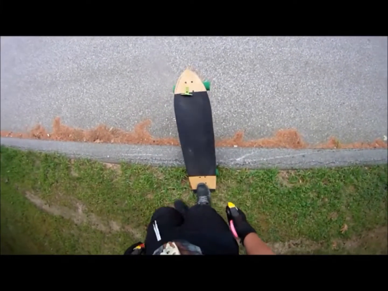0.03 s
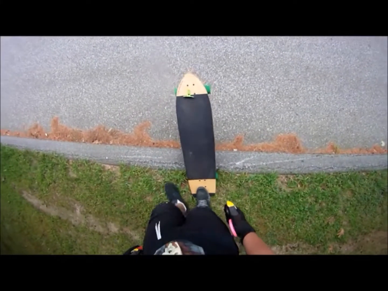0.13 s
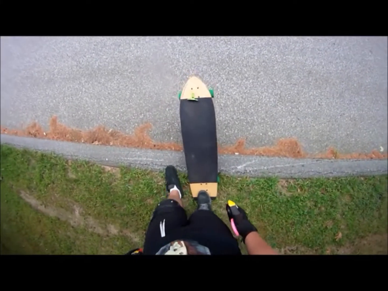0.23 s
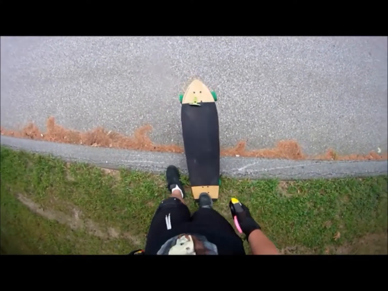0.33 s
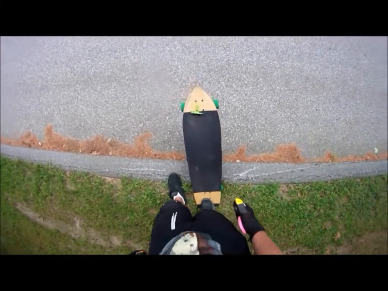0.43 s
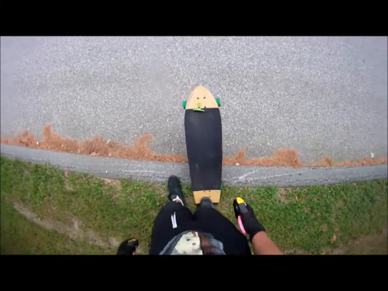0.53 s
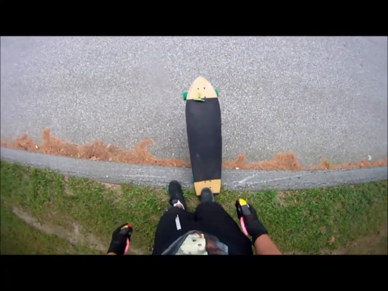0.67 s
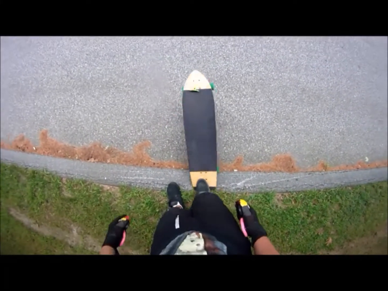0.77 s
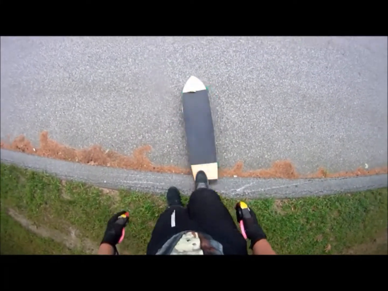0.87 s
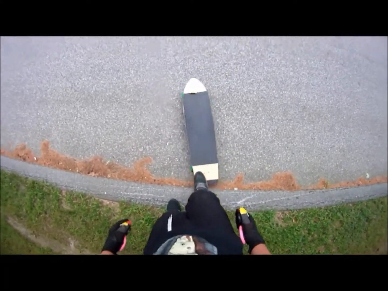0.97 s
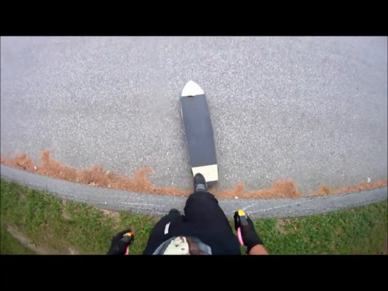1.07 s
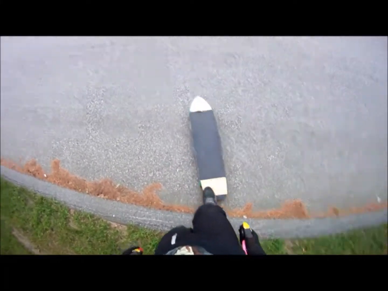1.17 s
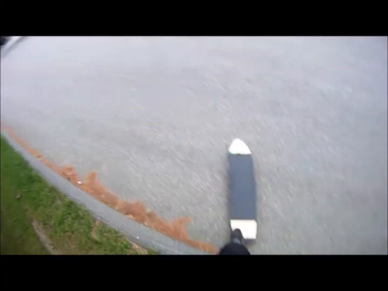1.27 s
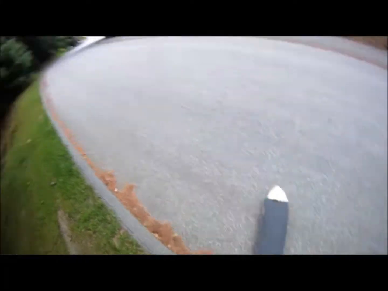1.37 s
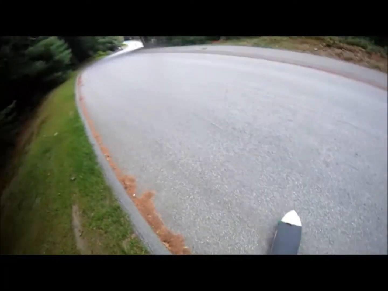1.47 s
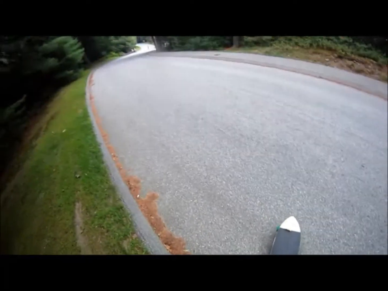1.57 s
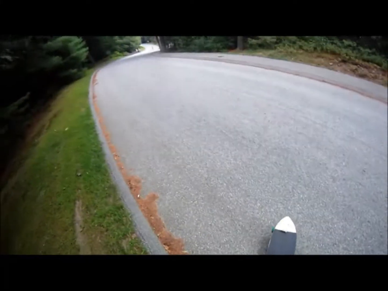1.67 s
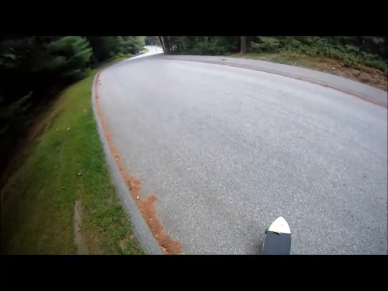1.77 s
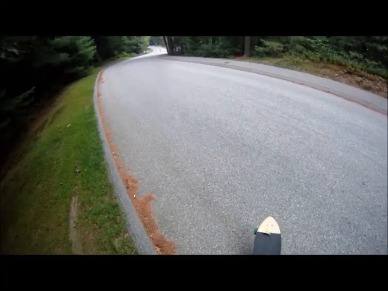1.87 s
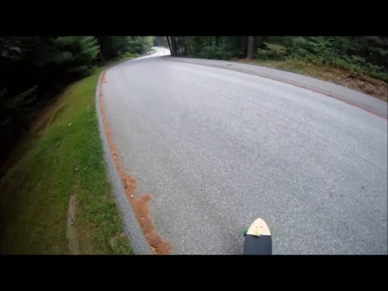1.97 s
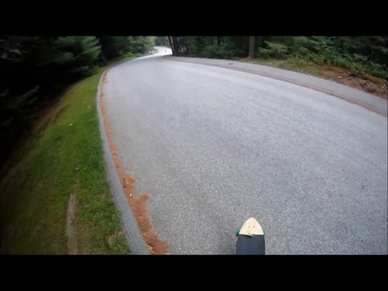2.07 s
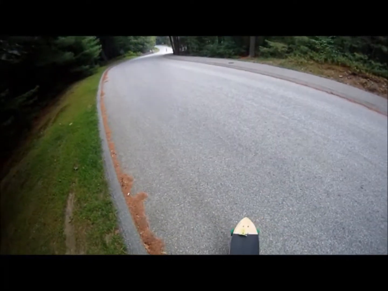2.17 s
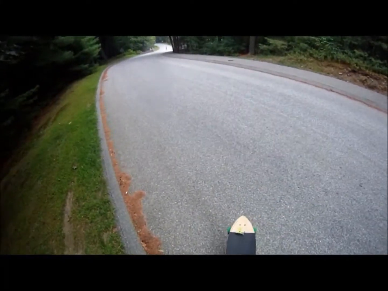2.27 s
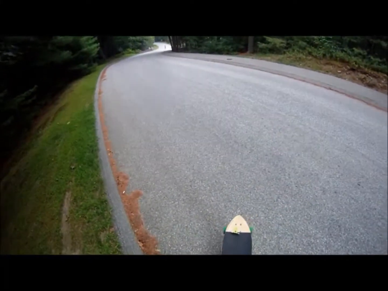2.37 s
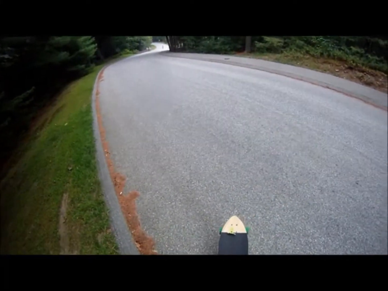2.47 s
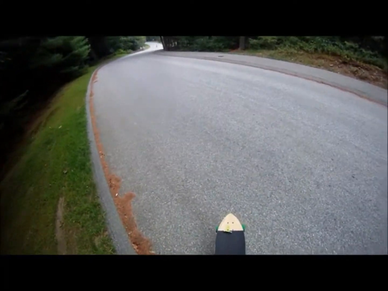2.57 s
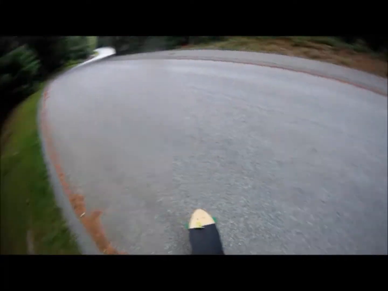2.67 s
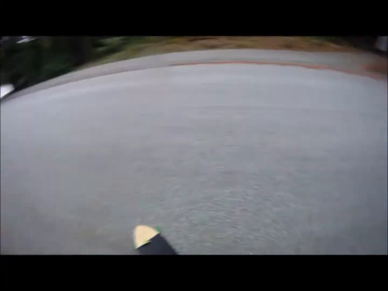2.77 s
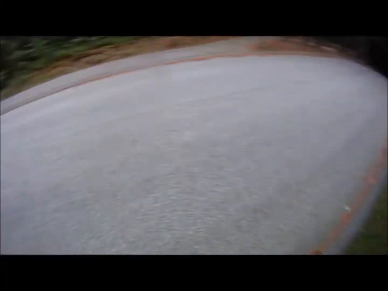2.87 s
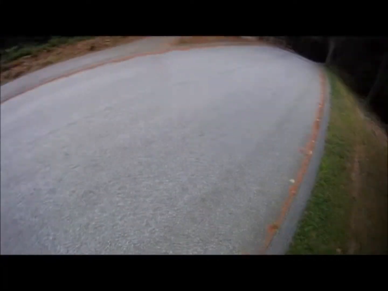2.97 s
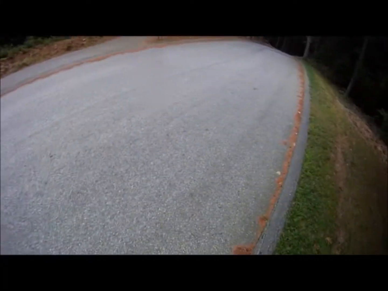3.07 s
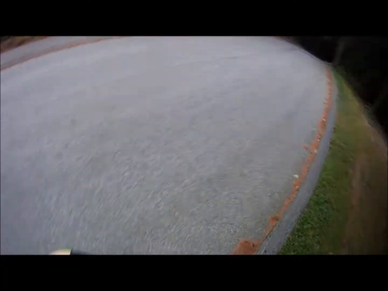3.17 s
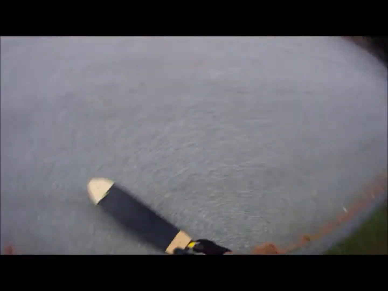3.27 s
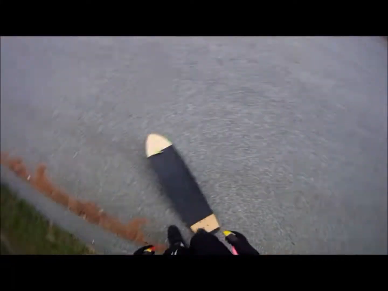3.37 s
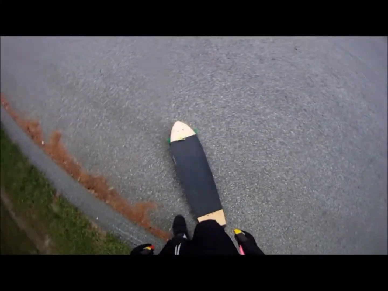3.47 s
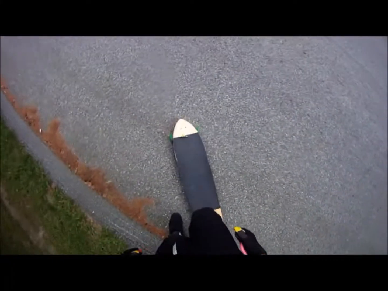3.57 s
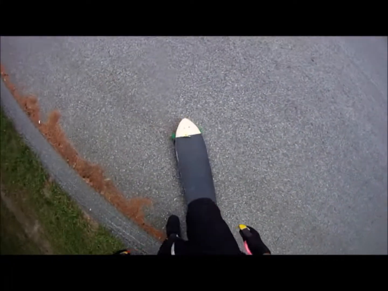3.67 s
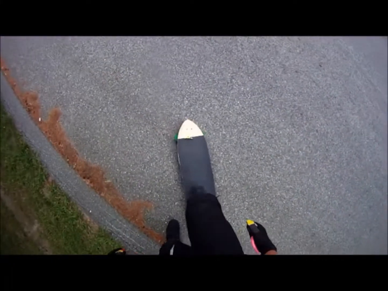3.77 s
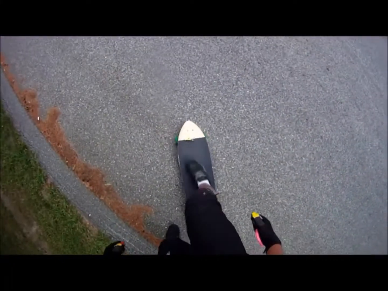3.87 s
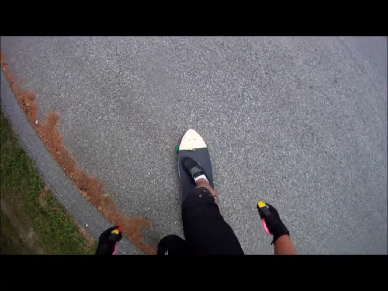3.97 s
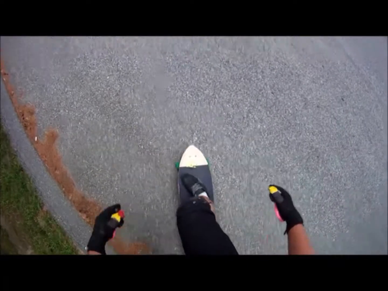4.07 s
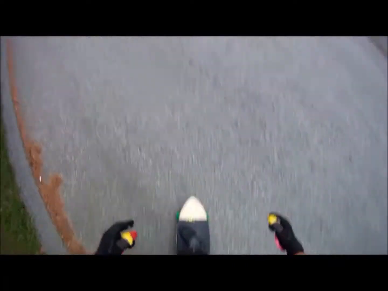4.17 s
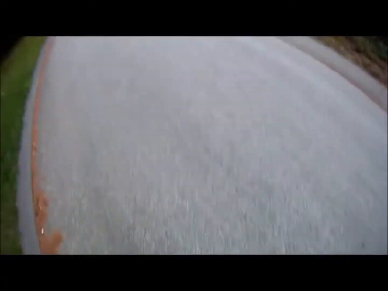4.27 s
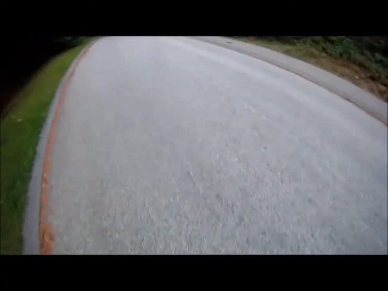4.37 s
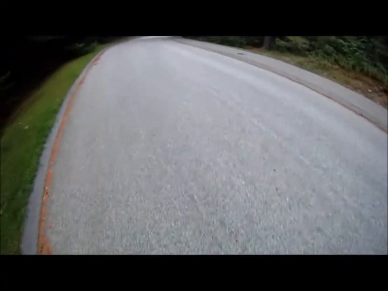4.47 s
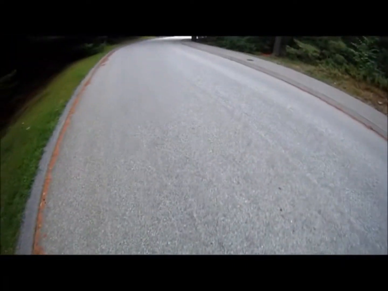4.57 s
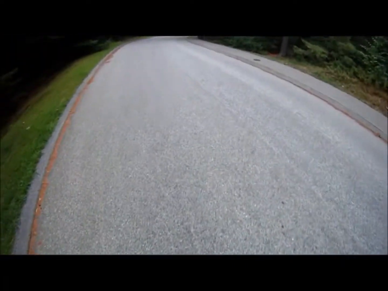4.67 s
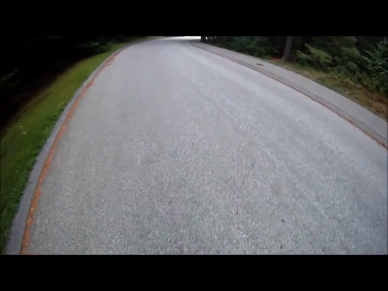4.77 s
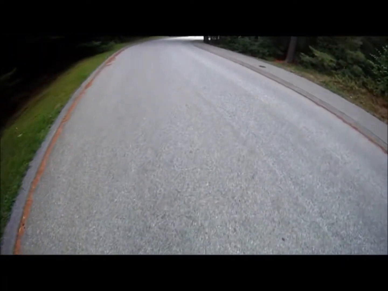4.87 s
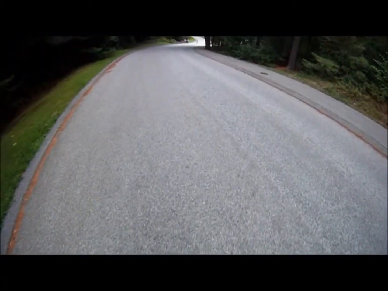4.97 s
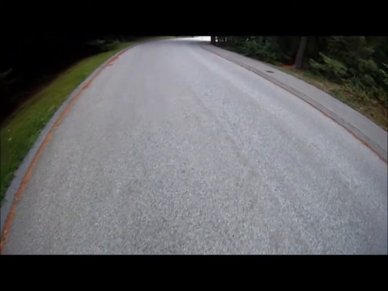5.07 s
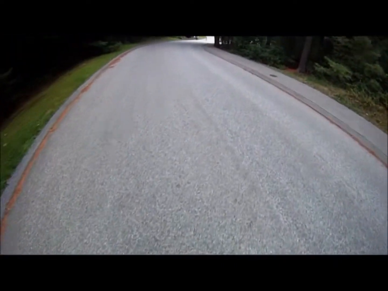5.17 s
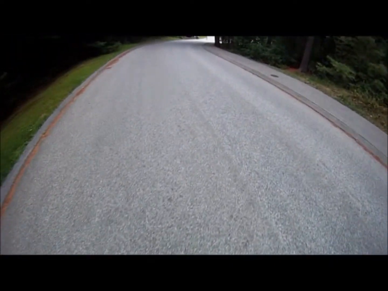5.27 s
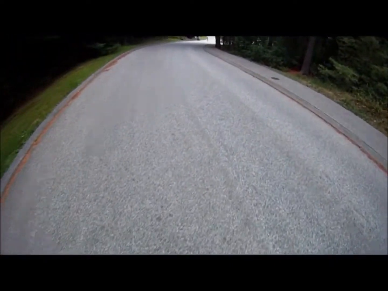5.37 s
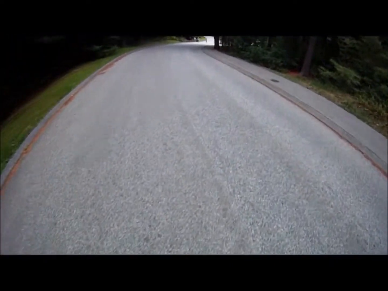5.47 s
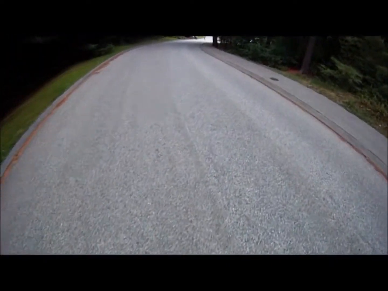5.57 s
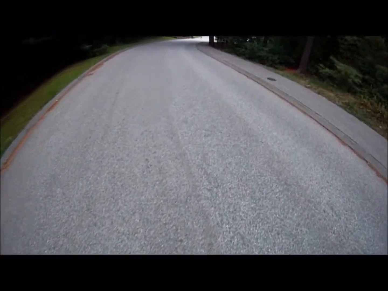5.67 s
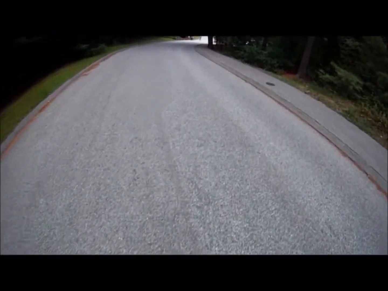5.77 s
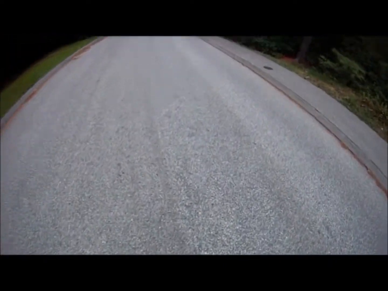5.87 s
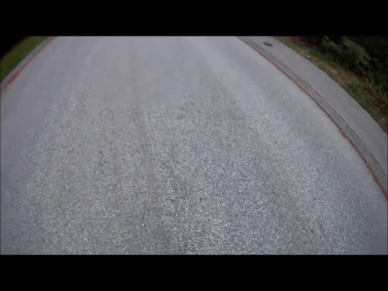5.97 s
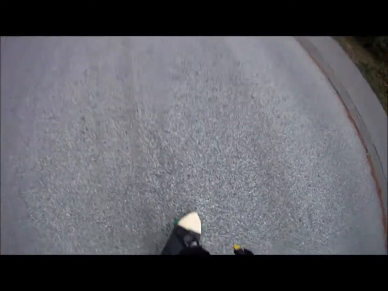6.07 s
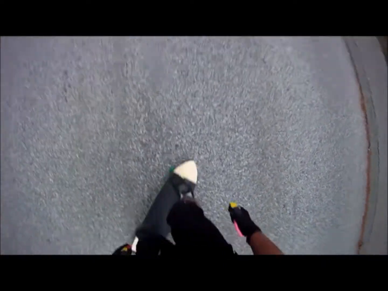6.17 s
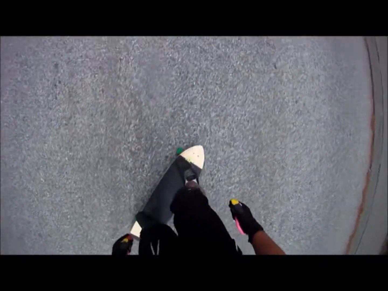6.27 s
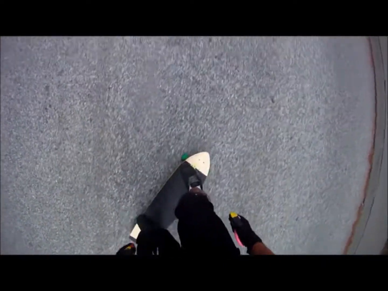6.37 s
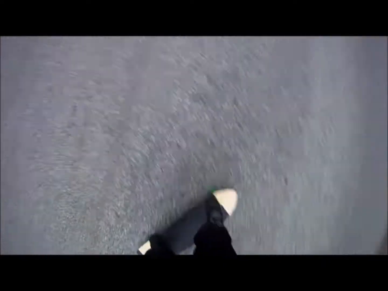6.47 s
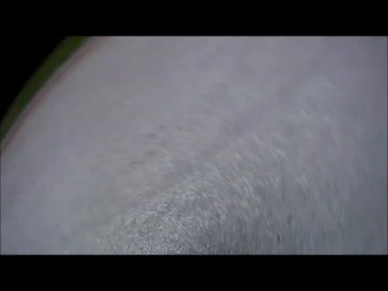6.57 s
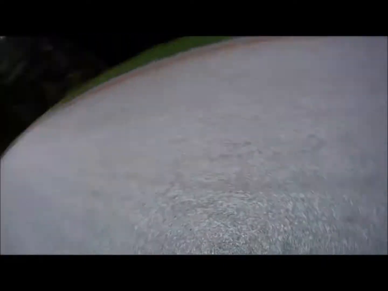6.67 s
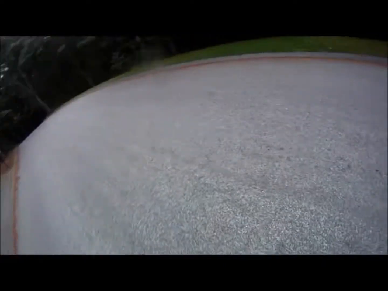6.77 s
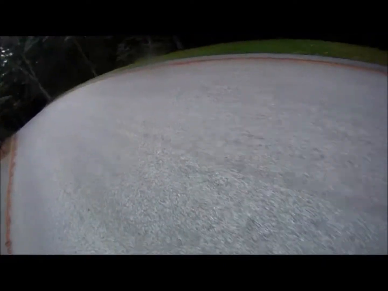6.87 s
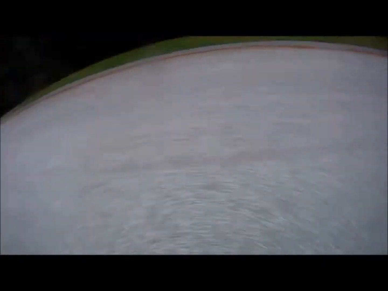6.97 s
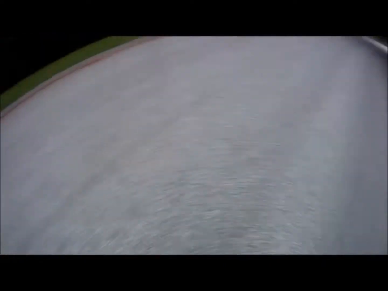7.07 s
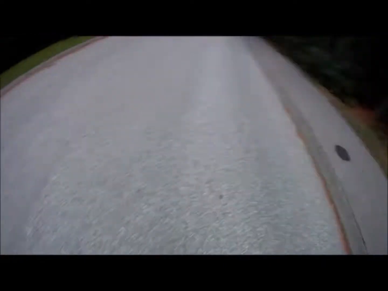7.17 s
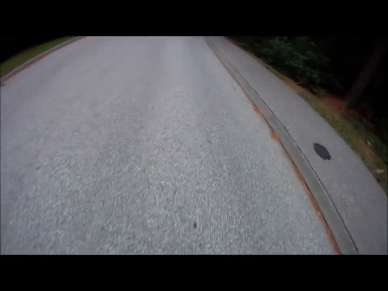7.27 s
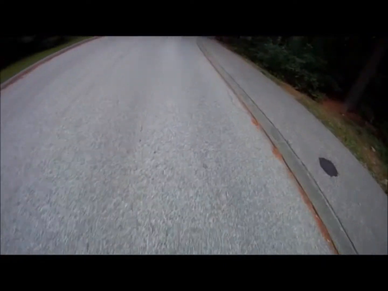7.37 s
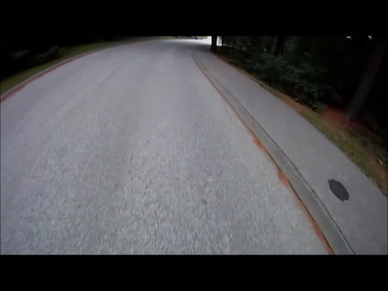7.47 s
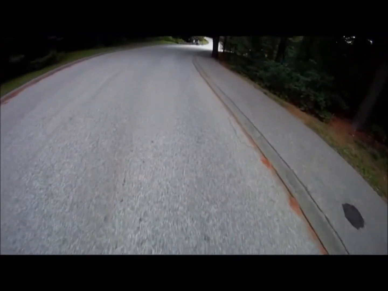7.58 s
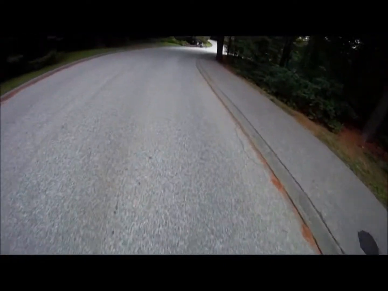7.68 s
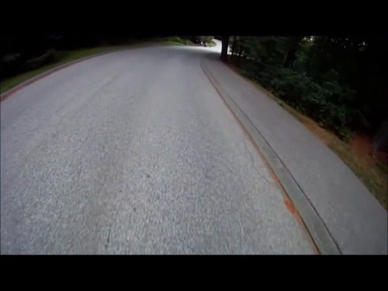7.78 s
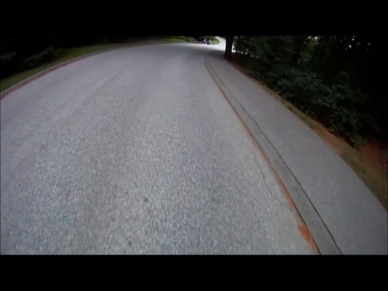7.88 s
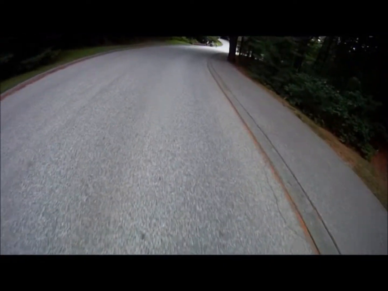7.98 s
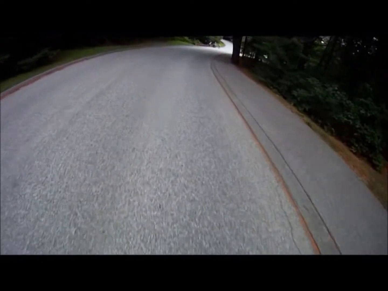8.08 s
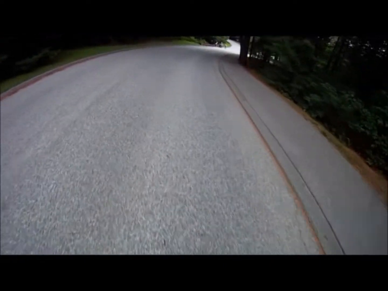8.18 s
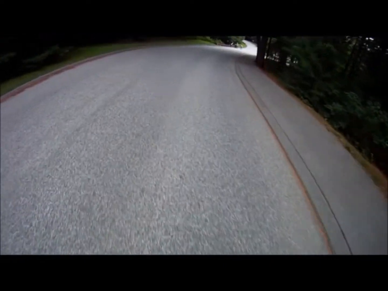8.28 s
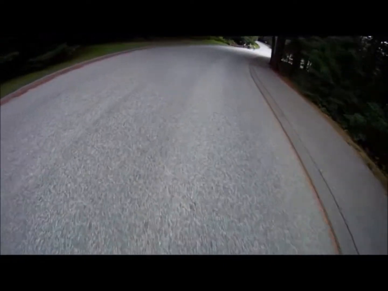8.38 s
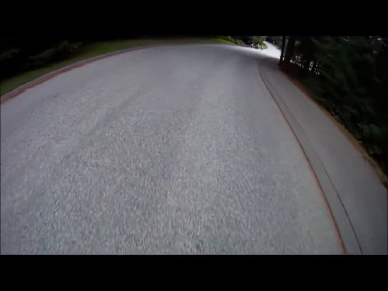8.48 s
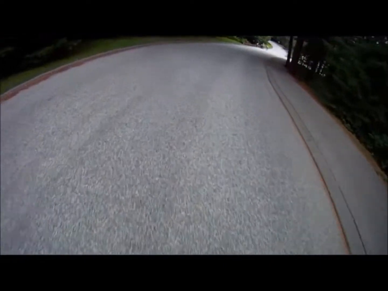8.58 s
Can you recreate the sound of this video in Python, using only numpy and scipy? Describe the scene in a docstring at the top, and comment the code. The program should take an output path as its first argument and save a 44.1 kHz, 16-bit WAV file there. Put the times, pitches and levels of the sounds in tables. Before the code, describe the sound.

Quiet outdoor air, a clattering board drop, hollow wheel nudges, a foot knock, then steady drumming wheel roar downhill with rising gusts.

```python
"""Still air and a faint hum, with rubs, ticks and taps of gear, inside the closed case of a helmet camera.
Near 0.9 s a longboard drops on asphalt: knocks ring in deck and case, bounces grate, nudged wheels roll.
Near 3.7 s it is stepped on; from 4.1 s it rides downhill, grit drumming the deck as noise through a resonance.
Wind, noise shaped by breeze and gusts, grows with speed. Low-rate sample holding adds a thin sizzle throughout;
the hardest knocks clip."""
import sys
import numpy as np
from scipy import signal
from scipy.fft import rfft, irfft
from scipy.io import wavfile
from scipy.ndimage import map_coordinates

SR = 44100
rng = np.random.default_rng(int(sys.argv[2]) if len(sys.argv) > 2 else 0)


def wrap_up_sound(samples):
    """Save the sound to the file named by the first command line argument, as 16-bit audio."""
    columns = np.atleast_2d(samples).T
    # keep every value between -1 and 1, then stretch to whole-number steps
    tamed = np.clip(columns, -1, 1)
    steps = np.round(tamed * 32767).astype(np.int16)
    wavfile.write(sys.argv[1], SR, steps)


N = 380141
T = np.arange(N) / SR

# Event levels are taken before the camera's band limit and clipping.
# blows of wheels, deck, feet and hard bumps: onset t/s, peak level/dB before the ring gain, ring f/Hz
KNOCK_EVENTS = [(0.692, -35, 495), (0.779, -36.5, 510), (0.822, -32, 446), (0.873, -9, 415),
                (0.902, -12, 385), (0.957, -16.5, 387), (1.043, -16.5, 394), (1.0512, 3.5, 415),
                (1.0612, -5.5, 558), (1.385, -9.5, 480), (1.394, -14.5, 450), (1.405, -13.5, 510),
                (1.423, -25, 454), (3.7164, 0.5, 500.5), (3.737, -20.5, 487), (3.8672, -3.5, 453),
                (3.946, -10.5, 487), (3.9527, -8, 450), (4.012, -6.5, 410), (4.022, -13.5, 397),
                (4.075, -19.5, 480), (4.654, -16, 510), (4.735, -13.5, 433), (5.443, -18.5, 466),
                (6.82, -11, 429.4), (7.432, -9, 455), (7.516, -8, 429), (8.122, -11, 503),
                (8.272, -7.5, 430), (8.43, -12.5, 479), (8.44, -4.5, 449)]
# hard contacts of board, trucks and grit: t/s, peak level/dB
CRACK_EVENTS = [(0.8716, -8.5), (0.9025, -39), (0.9298, -33), (0.9555, -35.5), (1.0535, -22.5),
                (3.7165, -24.5), (3.7205, -21), (3.8705, -25), (3.9885, -36), (4.012, -32.5)]
# sharp ticks of grit and gear: t/s, peak level/dB before the tick gain
TICK_EVENTS = [(0.11, -48.5), (0.3641, -45.5), (3.2967, -38), (3.7195, -29.5), (3.8705, -39), (3.9885, -46),
               (5.9329, -45), (6.5963, -45), (7.0261, -43.5), (7.2629, -42.5), (8.2765, -44), (8.4414, -47)]
# soft taps of the rider's gear: t/s, peak level/dB
TAP_EVENTS = [(0.44, -40.5), (0.443, -38.5), (0.4485, -35), (2.787, -31.5), (2.792, -39)]
# shoe and clothes rubs, dull thuds, low deck rumble, and wheel hiss as the board carves:
# peak t/s, spread/s, level/dB, f/Hz, width/octaves
SWELL_EVENTS = [(0.053, 0.016, -50.5, 516, 0.45), (0.77, 0.11, -49, 110, 1.2),
                (0.889, 0.025, -29.5, 201, 1.4), (1.216, 0.11, -60, 2350, 0.62),
                (3.457, 0.039, -40, 55, 1.3), (4.06, .03, -51, 1130, 0.4), (4.138, 0.01, -53.5, 1720, 0.79),
                (4.29, 0.091, -64, 2380, 0.61), (4.482, 0.2, -41.5, 105, 0.41),
                (4.869, 0.037, -52.5, 2100, 0.57), (5.112, 0.033, -53, 2400, 0.54),
                (5.156, 0.018, -43, 838, 0.25), (5.385, 0.022, -48.5, 870, 0.28),
                (6.522, 0.22, -59, 2360, 0.67), (6.765, 0.062, -50.5, 1060, .25),
                (7.179, .025, -54.5, 1289, 0.57)]
# stretches of wheel roll as the board is nudged, some running on from one another:
# start t/s, length/s, rumble level/dB, fade/(dB/s), hiss level/dB, centre f/Hz
ROLL_STRETCHES = [(0.686, 0.1785, -49, -36, -73, 480), (1.017, 0.12, -31, 0, -59, 450),
                  (1.153, 0.22, -28, 69, -61, 459.5), (1.378, 0.043, -30, -2, -53, 474.3),
                  (1.414, 0.5, -46.5, 15, -78, 472), (1.92, 1.4, -60, 2, -86, 434),
                  (3.52, 0.2, -52, -10, -74, 450.3), (3.722, 0.13, -30, -4, -60, 475),
                  (3.84, 0.13, -23, 0, -53.5, 462), (3.972, 0.148, -29.5, -2, -61, 440)]
# gusts as the head turns into the airflow: start t/s, length/s, level/dB before the wind gain
GUST_EVENTS = [(4.65, 0.44, -44), (5.048, 1.22, -37), (5.458, 0.24, -35), (5.98, 0.22, -36),
               (7.0, 0.051, -26.5), (7.17, 0.11, -19.5), (7.402, 0.12, -22.5), (7.57, 1.1, -23.5)]
# push-off, settling, then gathering speed downhill: t/s, speed/(m/s)
SPEED_COURSE = [(4.1, 1.06), (4.45, 1.43), (4.75, 3.57), (5.15, 2.77), (6.2, 3.22), (7.1, 4.1), (7.7, 5.81),
                (8.62, 5.95)]
# faint wavering hum lines: f/Hz, width/Hz, level/dB before the hum's course
HUM_LINES = [(72.6, 8, -63.5), (155.4, 8, -66.5), (398, 14, -58), (702, 190, -62.5)]
# course of the hum: t/s, gain/dB
HUM_COURSE = [(0, -18.5), (1.2, 0.3)]

# Source spectra as heard inside the case, relative: f/Hz, level/dB (per Hz)
# deck resonance under the wheels
RUMBLE_SPECTRUM = [(40, -36.5), (110, -14.5), (215, -10.5), (260, -7), (305, -8.5), (390, -5), (445, 4),
                   (520, -1.5), (620, -13), (730, -24), (850, -31.5), (1020, -34), (1400, -49),
                   (2000, -66.5)]
# wheel treads
TREAD_SPECTRUM = [(700, -21.5), (1200, 0.5), (1800, -7.5), (2250, 3), (2900, -6.5), (3600, -12),
                  (4600, -21.5), (5600, -20.5)]
# wind on the case
BUFFET_SPECTRUM = [(15, -13), (35, -3.5), (60, 0), (130, -2.5), (200, -8.5), (260, -8), (340, -15),
                   (600, -30), (1200, -53.5)]
# board grating over asphalt
GRATING_SPECTRUM = [(30, -18), (110, -3), (300, -3), (550, 2.5), (720, -8), (880, -18.5), (1400, -25),
                    (3200, -28), (3900, -37), (5500, -44)]
# hard contacts
CRACK_SPECTRUM = [(150, -14), (700, 19), (1500, 1), (2800, 10), (3600, -2.5), (5500, -18)]
# grit and gear ticks
TICK_SPECTRUM = [(800, -16.5), (2000, -20.5), (2900, 1.5), (4200, -11.5), (4650, 5.5), (5000, -10.5),
                 (5600, -6)]
# gear taps
TAP_SPECTRUM = [(50, -14), (170, -0.5), (290, 14.5), (450, 2.5), (800, -8.5), (2500, -24), (5000, -36)]
# ground thumps
THUMP_SPECTRUM = [(35, -24), (90, -10.5), (165, 6), (260, -3), (500, -25), (1500, -52.5)]
# still outdoor air
AIR_SPECTRUM = [(25, 0.5), (50, 0), (110, -4.5), (230, -5), (330, -9), (620, -5), (760, -17.5),
                (950, -15.5), (1400, -20), (2800, -22), (3800, -27), (5500, -25.5)]

AIR_DB = -56
ROLL_EDGE_S, GUST_EDGE_S = 0.017, 0.11
# the dropped board chatters to rest, each bounce shorter than the last
LANDS_S, FIRST_BOUNCE_S, BOUNCE_SHRINK = 0.872, 0.031, 0.92
# riding levels at cruising speed (breeze before the wind gain), and growth for a tenfold speed
CRUISE_M_S = 4
RUMBLE_DB, HISS_DB, BREEZE_DB = -21.5, -59.5, -45.5
ROLL_DB_PER_DECADE, BREEZE_DB_PER_DECADE = 29.5, 19
# rumble sits high under one foot, drops under full weight, climbs with speed
RUMBLE_HZ = 455  # pitch at which the rumble spectrum is unshifted
ONE_FOOT_HZ, LOADED_HZ, HZ_PER_M_S = 482.9, 448.1, 3
BOTH_FEET_S, SETTLE_S = 4.75, 0.22
# loose pebbles and grit ticks under way: level above RUMBLE_DB, before ring and tick gains
PEBBLES_PER_M, PEBBLE_DB, PEBBLE_SCATTER_DB = 1.3, 6.5, 4
GRIT_TICKS_PER_M, GRIT_TICK_DB = 0.44, -30.5
HOLD_HZ, TOP_HZ = 12000, 15300  # camera sample hold rate, output band edge


def undb(db):
    """Decibels to gain."""
    return 10 ** (np.asarray(db) / 20)


def unit(x):
    """Scale to rms 1."""
    return x / np.sqrt(np.mean(x ** 2))


def curve(table):
    """Rows (t/s, value) joined by straight lines in time."""
    return np.interp(T, *np.transpose(table))


def held(start_s, length_s, edge_s):
    """An envelope that rises, holds and falls."""
    return np.clip(np.minimum(T - start_s, start_s + length_s - T) / edge_s + 0.5, 0, 1)


def response(points, size=8192):
    """Causal minimum-phase impulse response of a spectrum, peak 1."""
    hz, db = np.transpose(points)
    f = np.arange(size // 2 + 1) * SR / size + 1
    octaves_beyond = np.abs(np.log2(f / np.clip(f, hz[0], hz[-1])))
    spectrum_db = np.interp(np.log(f), np.log(hz), db) - 20 * octaves_beyond
    # folding the cepstrum gives minimum phase
    cepstrum = irfft(np.log(undb(spectrum_db)))
    cepstrum[1:size // 2] *= 2
    cepstrum[size // 2 + 1:] = 0
    h = irfft(np.exp(rfft(cepstrum)))
    return h / np.abs(h).max()


def colour(x, points):
    """Let a signal ring through a spectrum."""
    return signal.fftconvolve(x, response(points))[:N]


def walk(rate):
    """Smooth random course, rms 1, changing about rate times a second."""
    f = np.arange(N // 2 + 1) * SR / N
    noise = rfft(rng.standard_normal(N))
    return unit(irfft(noise * np.exp(-(f / rate) ** 2), N))


def waver(hz, width_hz):
    """A resonance kept going by random pushes: a tone of unsteady level and phase."""
    phase = 2 * np.pi * hz * T
    return unit(walk(width_hz) * np.cos(phase) + walk(width_hz) * np.sin(phase))


def grit(per_s, spread_db):
    """Stones met at random moments, each of its own size."""
    met = rng.random(N) < per_s / SR
    size = rng.standard_normal(N) * undb(spread_db * rng.standard_normal(N))
    return unit(met * size / np.sqrt(per_s))


def clicks(table, points):
    """One short push for each row, coloured by a spectrum."""
    pushes = np.zeros(N)
    for s, db in table:
        pushes[int(s * SR)] += undb(db)
    return colour(pushes, points)


def with_speed(db_per_decade):
    """Gain that grows with speed: 1 when cruising, 0 before the push-off."""
    under_way = np.clip((T - SPEED_COURSE[0][0]) / ROLL_EDGE_S, 0, 1)
    return under_way * undb(db_per_decade * np.log10(curve(SPEED_COURSE) / CRUISE_M_S))


def strewn(per_m, db, scatter_db):
    """Things met at random along the road, struck harder at speed: rows (t/s, peak level/dB)."""
    speed = curve(SPEED_COURSE)
    metres = np.cumsum(speed * (T > SPEED_COURSE[0][0])) / SR
    chance = rng.random((100, 2))
    places = (np.arange(len(chance)) + chance[:, 0]) / per_m
    at = np.searchsorted(metres, places[places < metres[-1]])
    peaks = RUMBLE_DB + db + ROLL_DB_PER_DECADE * np.log10(speed[at] / CRUISE_M_S)
    scatter = scatter_db * (2 * chance[:len(at), 1] - 1)
    return list(zip(at / SR, peaks + scatter))


def wheels(hz, rumble_gain, hiss_gain):
    """Grit drums the deck and the treads hiss; both swell together on coarse patches."""
    stones_per_s = np.interp(T, [4, 8.6], [2000, 3200])
    patch = walk(rate=32)
    drum = colour(grit(stones_per_s, spread_db=1.0), RUMBLE_SPECTRUM)
    # reading faster or slower slides the resonance as the rider's weight shifts
    read_at = np.cumsum(hz / RUMBLE_HZ)
    drum = map_coordinates(drum, [read_at], order=3, mode="mirror")
    drum = unit(drum * undb(0.95 * patch))
    hiss = colour(grit(4 * stones_per_s, spread_db=0.0), TREAD_SPECTRUM)
    hiss = unit(hiss * undb(0.45 * patch))
    return drum * rumble_gain + hiss * hiss_gain


def background():
    """Still outdoor air and a faint hum whose lines waver."""
    air = colour(rng.standard_normal(N), AIR_SPECTRUM)
    air = unit(air * undb(1.0 * walk(rate=6.7))) * undb(AIR_DB)
    hum = sum(undb(db) * waver(hz, width) for hz, width, db in HUM_LINES)
    return air + hum * undb(curve(HUM_COURSE))


def rubs_thuds_and_carving(ragged_db, rise_share):
    """Rubs, thuds, deck rumble and carving hiss: dense tiny slips in a band, swelling fast, fading unevenly."""
    out = np.zeros(N)
    slips = rfft(grit(4000, spread_db=0.5))
    f = np.arange(len(slips)) * SR / N + 1
    for s, spread_s, db, hz, octaves in SWELL_EVENTS:
        band = np.exp(-(np.log2(f / hz) / octaves) ** 2)
        noise = unit(irfft(slips * band, N))
        side_s = 2 * spread_s * np.where(T < s, rise_share, 1 - rise_share)
        out += undb(db) * np.exp(-((T - s) / side_s) ** 2 / 2) * noise
    return out * undb(ragged_db * walk(rate=50))


def ticks(gain_db):
    """Grit and gear tick sharply; under way more grit ticks at random along the road."""
    road = strewn(GRIT_TICKS_PER_M, GRIT_TICK_DB, PEBBLE_SCATTER_DB)
    return undb(gain_db) * clicks(list(TICK_EVENTS) + road, TICK_SPECTRUM)


def taps():
    """Gear taps softly: single pushes through a dull spectrum."""
    return clicks(TAP_EVENTS, TAP_SPECTRUM)


def nudged_rolling():
    """Wheels roll in stretches as the board is nudged, some running on from one another."""
    rumble, hiss = np.zeros((2, N))
    for s, length_s, db, fade_db_per_s, hiss_db, _ in ROLL_STRETCHES:
        fade = undb(-fade_db_per_s * np.clip(T - s, 0, length_s))
        roll = held(s, length_s, ROLL_EDGE_S) * fade
        rumble += undb(db) * roll
        hiss += undb(hiss_db) * roll
    hz = curve([(s + length_s / 2, hz) for s, length_s, *_, hz in ROLL_STRETCHES])
    return wheels(hz, rumble, hiss)


def knocks(rise_s, gain_db, thump_db, crunch_db, crunch_s):
    """Each blow swells and dies within a few cycles in deck and case, thumps the ground and crunches grit."""
    ring, push, crunch = np.zeros((3, N + SR))
    t = np.arange(SR // 20) / SR
    swell = (t / rise_s * np.exp(1 - t / rise_s)) ** 3
    strewn_pebbles = strewn(PEBBLES_PER_M, PEBBLE_DB, PEBBLE_SCATTER_DB)
    pebbles = [(s, db, LOADED_HZ) for s, db in strewn_pebbles]
    for s, db, hz in list(KNOCK_EVENTS) + pebbles:
        start = int(s * SR)
        span = slice(start, start + len(t))
        ring[span] += undb(db) * swell * np.cos(2 * np.pi * hz * (t - rise_s))
        crunch[span] += undb(db) * np.exp(-t / crunch_s)
        push[start] += undb(db)
    grains = unit(colour(rng.standard_normal(N), CRACK_SPECTRUM))
    thump = colour(push, THUMP_SPECTRUM)
    return undb(gain_db) * ring[:N] + undb(thump_db) * thump + undb(crunch_db) * crunch[:N] * grains


def cracks():
    """Board, trucks and grit meet hard: single pushes through a bright spectrum."""
    return clicks(CRACK_EVENTS, CRACK_SPECTRUM)


def scrape(db, landing_db, loss_db, bite_s, count=6):
    """The board grates over the asphalt on each bounce, hardest as it lands, catching and slipping."""
    catch = undb(1.2 * walk(rate=70))
    slips = grit(11000, spread_db=2)
    contact, s = np.zeros(N), LANDS_S
    for k in range(count):
        level_db = db - k * loss_db if k else landing_db
        contact += undb(level_db) * (T >= s) * np.exp(-np.abs(T - s) / bite_s)
        s += FIRST_BOUNCE_S * BOUNCE_SHRINK ** k
    settled = np.clip((s - T) / bite_s, 0, 1) ** 2  # 1 while bouncing, 0 at rest
    return unit(colour(slips, GRATING_SPECTRUM) * catch) * contact * settled


def flex(hz, width_hz, start_s, length_s, db):
    """The long deck hums in its bending mode while one foot rolls it along."""
    return waver(hz, width_hz) * held(start_s, length_s, ROLL_EDGE_S) * undb(db)


def ride(uneven_db):
    """Speed sets the level of the roar, load and speed its pitch; the asphalt varies along the way."""
    loaded = np.clip((T - BOTH_FEET_S) / SETTLE_S + 0.5, 0, 1)
    both_feet_hz = LOADED_HZ + HZ_PER_M_S * (curve(SPEED_COURSE) - CRUISE_M_S)
    hz = (1 - loaded) * ONE_FOOT_HZ + loaded * both_feet_hz
    roar = with_speed(ROLL_DB_PER_DECADE) * undb(uneven_db * walk(rate=4.8))
    return wheels(hz, undb(RUMBLE_DB) * roar, undb(HISS_DB) * roar)


def wind(flutter_db, gain_db):
    """Under way, eddies shed by the helmet buffet the case: breeze and gusts add in power."""
    eddies = colour(rng.standard_normal(N), BUFFET_SPECTRUM) * undb(flutter_db * walk(rate=17))
    breeze = undb(BREEZE_DB) * with_speed(BREEZE_DB_PER_DECADE)
    gusts = sum((undb(db) * held(s, length_s, GUST_EDGE_S)) ** 2 for s, length_s, db in GUST_EVENTS)
    return unit(eddies) * np.sqrt(breeze ** 2 + gusts) * undb(gain_db)


def scene():
    """Everything reaches the one microphone inside the case."""
    small = rubs_thuds_and_carving(ragged_db=1.5, rise_share=0.32) + ticks(gain_db=5.5) + taps()
    blows = knocks(rise_s=0.003226, gain_db=1.62, thump_db=-15.5, crunch_db=-38, crunch_s=0.0092)
    landing = cracks() + scrape(db=-24.5, landing_db=-17.5, loss_db=1.1, bite_s=0.02)
    bending = flex(hz=67.0, width_hz=7, start_s=3.73, length_s=0.22, db=-41.5)
    board = nudged_rolling() + blows + landing + bending + ride(uneven_db=1.0)
    mix = background() + small + board + wind(flutter_db=1.0, gain_db=2.5)
    return mix[None]


def record(dry):
    """Held samples mirror the rumble on both sides of the hold rate; the hardest knocks clip."""
    band = signal.sosfilt(signal.butter(10, 5450, fs=SR, output="sos"), dry)
    slow = signal.resample_poly(band, HOLD_HZ, SR, axis=1, padtype="antireflect")
    steps = np.repeat(slow, 4, axis=1)
    stepped = signal.resample_poly(steps, SR, 4 * HOLD_HZ, axis=1, padtype="antireflect")[:, :N]
    clipped = np.clip(stepped, -1, 1)
    return signal.sosfilt(signal.ellip(8, 0.2, 70, TOP_HZ, fs=SR, output="sos"), clipped)


dry = scene()
out = record(dry)
wrap_up_sound(out)
```